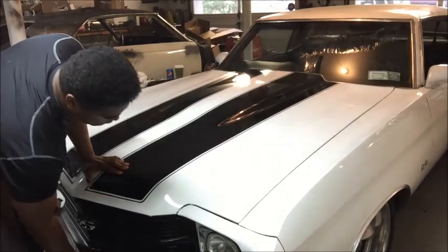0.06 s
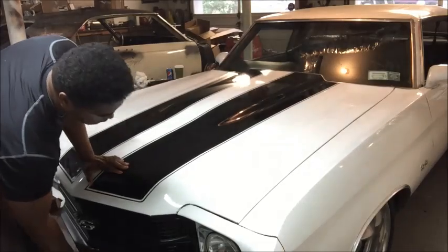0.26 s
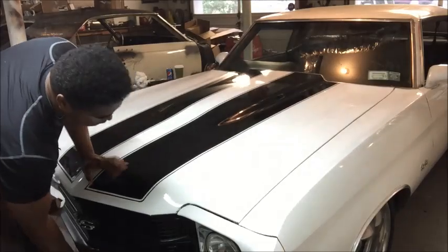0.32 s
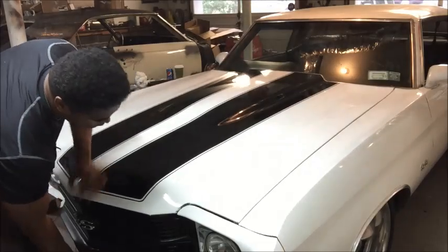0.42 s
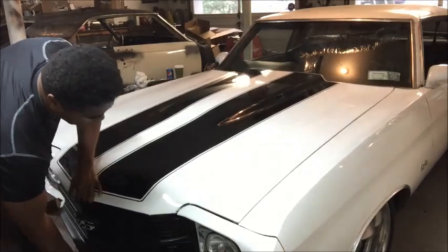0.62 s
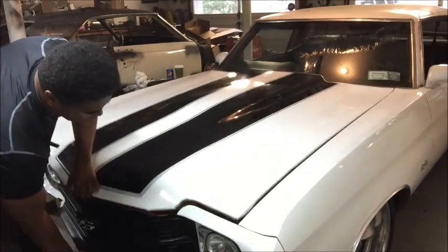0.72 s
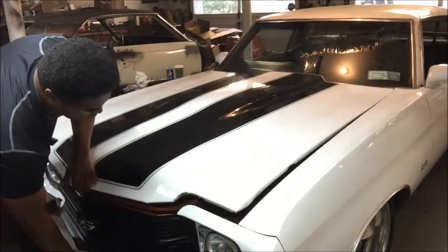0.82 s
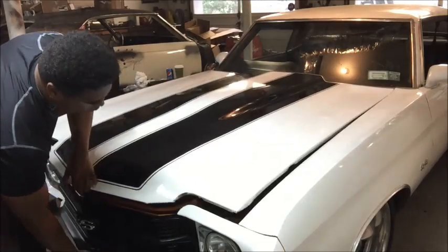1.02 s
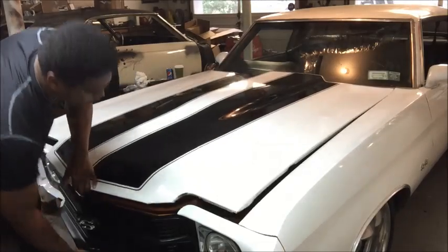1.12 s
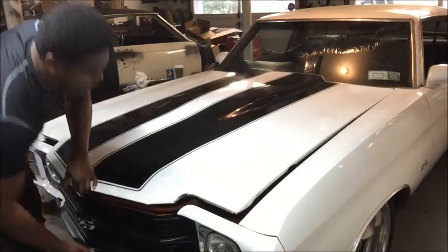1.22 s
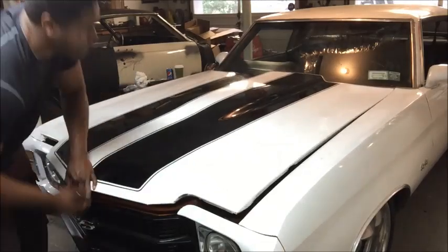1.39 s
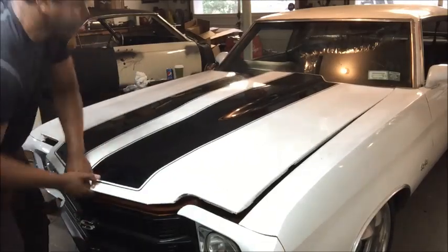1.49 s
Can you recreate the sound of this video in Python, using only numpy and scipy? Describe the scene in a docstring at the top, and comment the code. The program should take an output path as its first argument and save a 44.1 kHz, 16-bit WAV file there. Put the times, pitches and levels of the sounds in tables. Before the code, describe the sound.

Metal clunks and clicks as a car hood pops open, its panel rattling and booming.

```python
"""Faint steady hiss and a soft knock, then a loud clunk: the latch of a car's steel hood lets go.
The hood is bumped upward; the safety catch clicks twice and snaps free. Every blow rattles the
sheet metal, the lock's steel parts ring, and the big panel booms as it flexes.
The garage adds a short tail to the rattle and the lock."""
import sys
import numpy as np
from scipy import signal
from scipy.fft import rfft, irfft, next_fast_len
from scipy.io import wavfile
from scipy.ndimage import map_coordinates

SR = 44100
rng = np.random.default_rng(int(sys.argv[2]) if len(sys.argv) > 2 else 0)


def to_wav(s):
    """Save 16-bit WAV."""
    ch = np.atleast_2d(s).T  # columns
    pcm = np.round(np.clip(ch, -1, 1) * 32767)  # PCM
    wavfile.write(sys.argv[1], SR, pcm.astype(np.int16))


N = 68355

# Centres in Hz of six bands: body, clank, edge, chink, ring, sizzle.
BANDS_HZ = [350, 1100, 2300, 4500, 7200, 13000]
# Garage reverberation. Each row, one per band: t60 in seconds, tail level in dB.
GARAGE_BANDS = [(0.52, 3.5), (0.32, 6), (0.33, -1), (0.29, -2.5), (0.3, -4.5), (0.25, -4.5)]
# Modes of the catch plate, latch, hood spring, release lever and safety hook.
# Each row: frequency in Hz, level in dB.
PLATE = [(861, -51), (1270, -50), (1370, -44), (1688, -46), (1976, -48), (2081, -43), (2400, -51),
         (2732, -55), (3790, -57), (4393, -52), (4659, -56), (4832, -59)]
LATCH = [(409, -41), (957, -40), (1023, -42), (1077, -43), (1209, -40), (1321, -44), (1549, -44),
         (1603, -43), (1982, -44), (2283, -44), (2428, -43), (2519, -33), (3558, -43), (4330, -47),
         (5203, -47), (5359, -37), (6352, -47), (7262, -47), (7437, -47), (7922, -41), (8514, -48),
         (9022, -48), (9523, -46)]
SPRING = [(977, -52), (1141, -57), (1763, -57), (1949, -57), (2145, -49), (2592, -58), (3087, -57),
          (3661, -62), (4670, -60), (5071, -62)]
LEVER = [(869, -59), (1373, -53), (1464, -50), (1661, -44), (2100, -55), (2409, -51), (2595, -52),
         (2770, -56), (3389, -50), (3550, -51), (4223, -58), (4578, -58), (5303, -59), (5601, -58),
         (6140, -57), (6654, -62)]
HOOK = [(1755, -42), (1880, -44), (2883, -44), (3305, -42), (3978, -44), (5095, -48), (6320, -41),
        (6551, -42), (6900, -47), (8690, -48), (9771, -50)]
BLUR_RAD = 0.3  # phase unsteadiness of a mode


def amp(db):
    """Decibels to gain."""
    return 10 ** (np.asarray(db) / 20)


def unit(x):
    """Scale to rms 1."""
    return x / np.sqrt(np.mean(x ** 2) + 1e-20)


def along(points, hz):
    """Interpolate (Hz, value) points on a log axis."""
    knots_hz, values = np.transpose(points)
    return np.interp(np.log(hz + 1), np.log(knots_hz + 1), values)


def filtered(x, response):
    """Apply the gain response(hz) to x."""
    size = next_fast_len(N + SR // 2)
    return irfft(rfft(x, size) * response(np.fft.rfftfreq(size, 1 / SR)), size)[:N]


def noise(spectrum):
    """Noise of rms 1, coloured by (Hz, dB) points."""
    return unit(filtered(rng.standard_normal(N), lambda hz: amp(along(spectrum, hz))))


def since(start_s):
    """Seconds since the start, zero before it."""
    return np.maximum(np.arange(N) / SR - start_s, 0)


def strike(t, rise_s, t60_s):
    """Envelope: quick rise, exponential decay."""
    attack = 1 - np.exp(-(t / rise_s) ** 2)
    return attack * np.exp(-np.log(1000) * np.maximum(t - rise_s, 0) / t60_s)


def wobble(knots_per_s):
    """Smooth random curve."""
    return map_coordinates(rng.standard_normal(512), [np.arange(N) * knots_per_s / SR], mode="wrap")


def mode_tone(hz, t, blur_rad):
    """One mode's tone, rms 1, with unsteady phase."""
    return np.sqrt(2) * np.sin(2 * np.pi * (hz * t + rng.random()) + blur_rad * wobble(np.sqrt(hz) * 2))


def room_hiss():
    """Faint, nearly steady room noise."""
    # Hiss level. Each row: time in seconds, level in dB.
    levels = [(0, -69.5), (.6, -70), (1.0, -67), (1.499, -69)]
    # Hiss colour. Each row: frequency in Hz, relative density in dB.
    spectrum = [(20, -25), (60, 0.5), (120, -6.5), (350, -6.5), (600, -8), (1200, -8), (3000, -16.5),
                (7000, -20), (15800, -29.5)]
    return amp(np.interp(since(0), *np.transpose(levels))) * noise(spectrum)


def hood_flex(rumble_t60_s=0.35, waver_db=2, focus_db_per_octave=25.5):
    """Each flex gives a deep wavering boom, rings the panel modes near its pitch and rumbles briefly."""
    # Hood flexes. Each row: start and rise in seconds, boom pitch in Hz, boom level in dB,
    # boom t60 in seconds, panel pitch in Hz, mode gain in dB, rumble level in dB.
    flexes = [(.066, 0.025, 77.3, -53, 0.29, 119, -71, -66),
              (0.145, 0.0058, 68, -80, 0.17, 162, -69.5, -69),
              (0.235, 0.0074, 67.8, -51, 0.66, 402, -46, -55.5),
              (.285, 0.018, 67.9, -54, 0.44, 332, -46.5, -50.5),
              (0.487, 0.0024, 62.8, -79, .2, 339, -62.5, -76),
              (.800, 0.039, 75.3, -46, 0.41, 151, -55.5, -47.5),
              (.843, 0.02, 73.4, -52.5, 1, 280, -47, -48.5),
              (1.179, 0.012, 65.3, -52.5, 0.91, 417, -40, -49.5),
              (1.227, 0.0073, 62.5, -44, 0.15, 380, -47, -42),
              (1.29, 0.007, 64.2, -60, 0.38, 162, -56.5, -53),
              (1.36, 0.0099, 58.4, -50, 0.3, 203, -71.5, -93)]
    # Panel modes. Each row: frequency in Hz, relative level in dB, t60 in seconds.
    panel_modes = [(147, 7, 0.5), (176.9, 5, 0.52), (228.4, 0, 0.5), (279.8, 0.5, 0.49),
                   (318.8, -3.5, 0.58), (364.5, 1, 0.24), (418, -7.5, 0.37), (452, -7.5, 0.27)]
    # Rumble colour. Each row: frequency in Hz, relative density in dB.
    rumble_spectrum = [(20, -7), (40, -18), (100, -4), (150, 3), (210, 1), (380, -1.5), (520, -7),
                       (900, -50), (2500, -75), (8000, -100)]
    out = np.zeros(N)
    for start_s, rise_s, boom_hz, boom_db, boom_t60_s, panel_hz, modes_db, rumble_db in flexes:
        t = since(start_s)
        boom = np.sqrt(2) * np.sin(2 * np.pi * boom_hz * t + 0.9 * wobble(34.64))
        out += amp(boom_db + waver_db * wobble(44.7)) * strike(t, rise_s, boom_t60_s) * boom
        for hz, db, t60_s in panel_modes:
            loss_db = focus_db_per_octave * abs(np.log2(hz / panel_hz))
            out += amp(modes_db + db - loss_db) * strike(t, rise_s, t60_s) * mode_tone(hz, t, BLUR_RAD)
        out += amp(rumble_db) * strike(t, rise_s, rumble_t60_s) * noise(rumble_spectrum)
    return out


def sheet_ripple(hz, depth_db=1.8, step_hz=55):
    """Gain peaks and dips from a steel sheet's close resonances."""
    knots = rng.standard_normal(int(hz[-1] / step_hz) + 4)
    return unit(amp(depth_db * map_coordinates(knots, [hz / step_hz])))


def sheet_rattle(chatter_db=-0.8):
    """Each contact chatters and stirs the sheet metal's dense modes; the garage answers."""
    # Metal contacts. Each row: start, rise and t60 at 2 kHz in seconds, then six band levels in dB.
    contacts = [(0.068, 0.0037, 0.17, -64, -71.5, -74, -105, -87, -97),
                (0.181, 0.023, 0.3, -70, -64.5, -58.5, -67.5, -68, -82),
                (0.217, 0.012, 0.12, -73, -45, -44.5, -44.5, -39, -87),
                (0.2297, 0.0075, 0.07, -43.5, -30, -26.5, -31.5, -29, -34),
                (.263, 0.002, 0.041, -39.5, -36, -28.5, -52, -60, -58),
                (0.798, 0.014, 0.079, -51, -61, -65, -70, -86, -86),
                (0.822, 0.0066, 0.13, -50.5, -53, -46, -56.5, -72, -71),
                (1.0223, 0.0068, 0.14, -81, -56, -46.5, -51, -58.5, -70),
                (1.099, 0.0031, 0.17, -56, -47.5, -39.5, -53, -57.5, -63.5),
                (1.1711, 0.0024, 0.12, -67, -40, -33, -31, -33.5, -41.5)]
    out = np.zeros(N)
    for start_s, rise_s, t60_s, *bands_db in contacts:
        colour = [(60, bands_db[0] - 17.5), *zip(BANDS_HZ, bands_db), (16000, bands_db[-1] - 6)]

        def response(hz):
            pink_tilt = np.sqrt(SR / 2 / (hz + 20))
            return amp(along(colour, hz)) * sheet_ripple(hz) * pink_tilt

        metal = filtered(rng.standard_normal(N), response)
        chatter = amp(chatter_db * wobble(350))
        for band_hz, share, (room_t60_s, tail_db) in zip(BANDS_HZ, np.eye(len(BANDS_HZ)), GARAGE_BANDS):
            band = filtered(metal, lambda hz: along(list(zip(BANDS_HZ, share)), hz))
            direct = strike(since(start_s), rise_s, t60_s * (2000 / band_hz) ** 0.1)  # treble dies sooner
            tail_power = garage_tail((amp(tail_db) * direct) ** 2, room_t60_s)
            out += band * np.sqrt((chatter * direct) ** 2 + tail_power)
    return out


def garage_tail(power, t60_s):
    """Power of the diffuse tail: builds up from a sound, then dies away."""
    feedback = np.exp(-np.log(1e6) / (t60_s * SR))
    return signal.lfilter([1 - feedback], [1, -feedback], power)


def lock_ring(send_db=-5, scatter_rad=0.9):
    """Each struck steel part rings in its own modes, which linger, blurred, in the garage."""
    # Blows on the lock. Each row: part, then start, rise and t60 at 2 kHz in seconds, gain in dB.
    blows = [(PLATE, .069, .008, 0.067, -26), (LATCH, .2285, .006, 0.1, 0),
             (SPRING, .824, 0.0074, 0.097, 0), (LEVER, 1.027, 0.0082, 0.062, 2.3),
             (PLATE, 1.101, 0.0045, 0.091, 1), (HOOK, 1.171, 0.002, 0.11, 1),
             (PLATE, 1.192, 0.0058, 0.062, 1.5)]
    room_t60_s, tail_db = [list(zip(BANDS_HZ, column)) for column in np.transpose(GARAGE_BANDS)]
    out = np.zeros(N)
    for modes, start_s, rise_s, t60_s, blow_db in blows:
        t = since(start_s)
        for hz, db in modes:
            direct_power = strike(t, rise_s, t60_s * (2000 / hz) ** 0.18) ** 2  # high modes die sooner
            sent_power = amp(send_db + along(tail_db, hz)) ** 2 * direct_power
            tail_power = garage_tail(sent_power, along(room_t60_s, hz))
            power = direct_power + tail_power
            blur_rad = BLUR_RAD + scatter_rad * tail_power / (power + 1e-20) * min(hz / BANDS_HZ[3], 1)
            out += amp(blow_db + db) * np.sqrt(power) * mode_tone(hz, t, blur_rad)
    return out


def scene():
    """Sheet metal, lock, hood panel and hiss, in mono."""
    return (sheet_rattle() + lock_ring() + hood_flex() + room_hiss())[None]


def record(dry):
    """Roll off the deepest bass; cut the highest treble."""
    low_cut_hz, top_hz = 16.5, 15950
    return filtered(dry[0], lambda hz: (hz < top_hz) * hz ** 4 / (hz ** 4 + low_cut_hz ** 4))[None]


dry = scene()
out = record(dry)
to_wav(out)
```